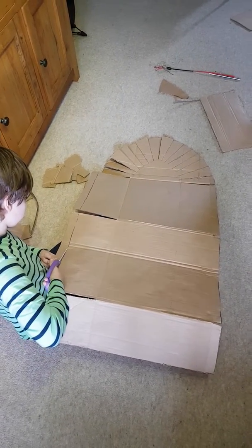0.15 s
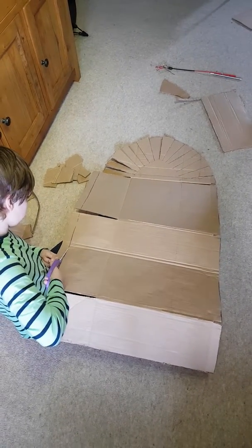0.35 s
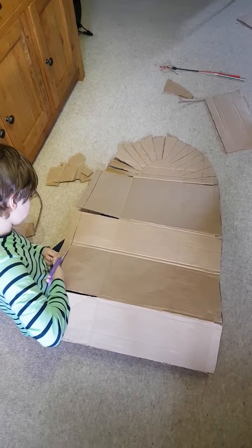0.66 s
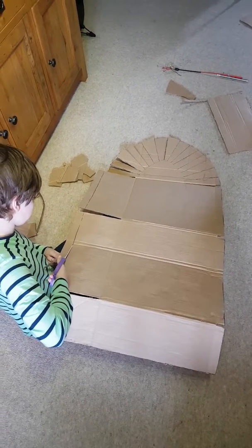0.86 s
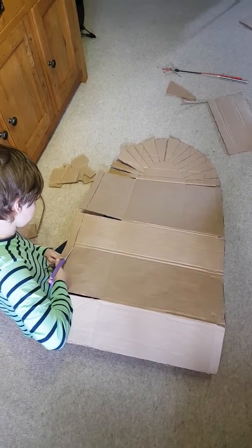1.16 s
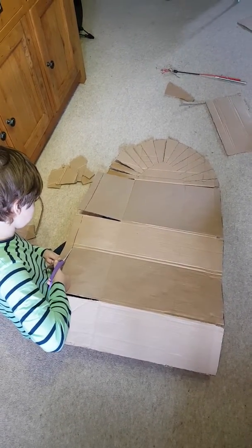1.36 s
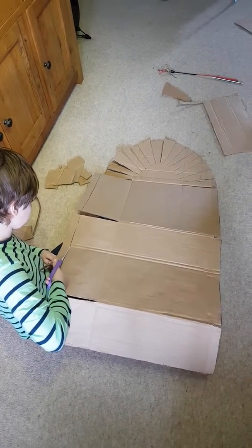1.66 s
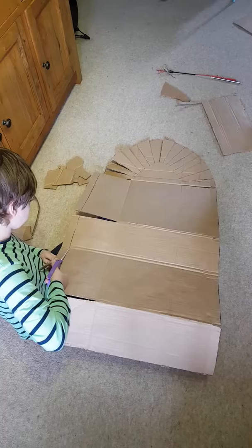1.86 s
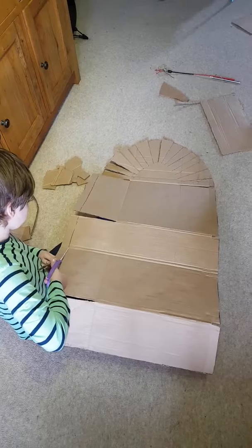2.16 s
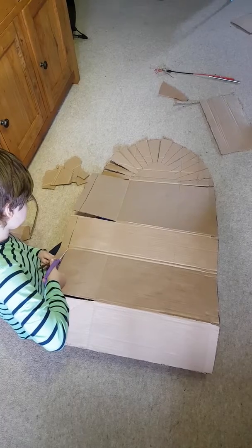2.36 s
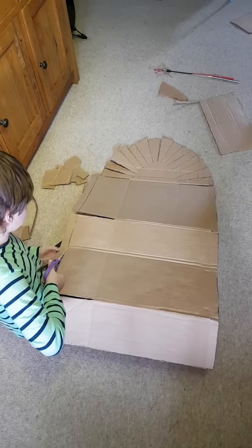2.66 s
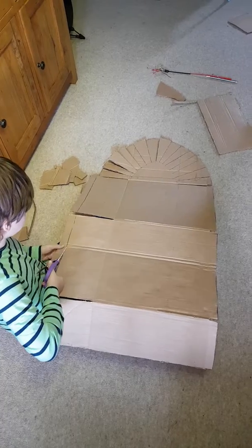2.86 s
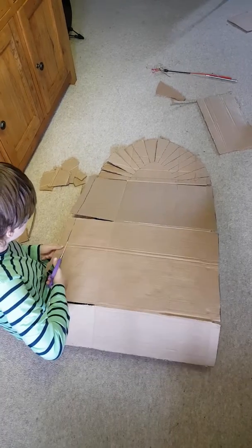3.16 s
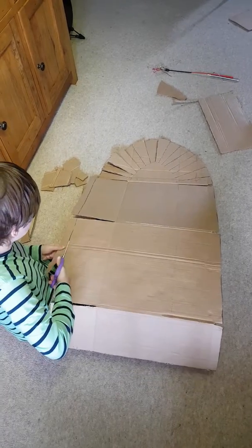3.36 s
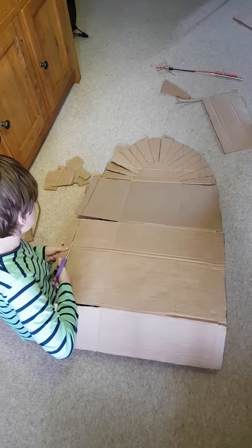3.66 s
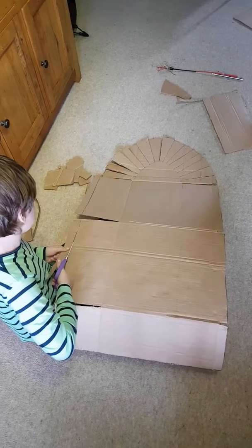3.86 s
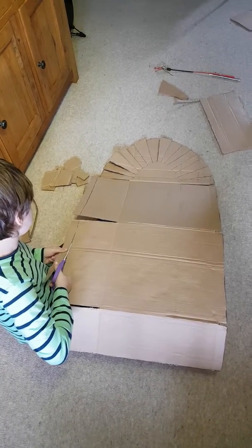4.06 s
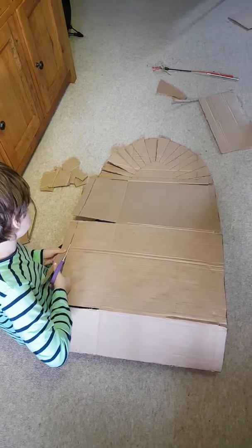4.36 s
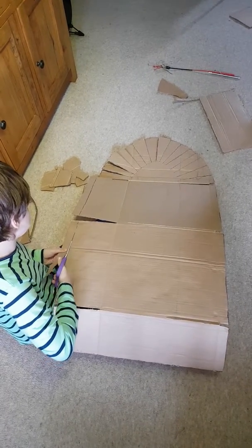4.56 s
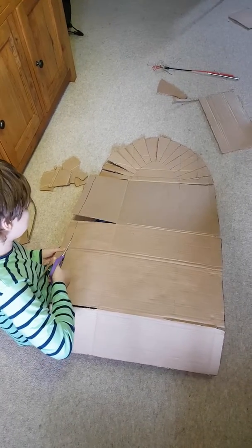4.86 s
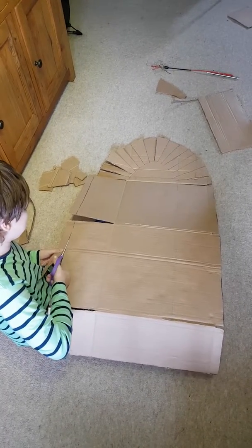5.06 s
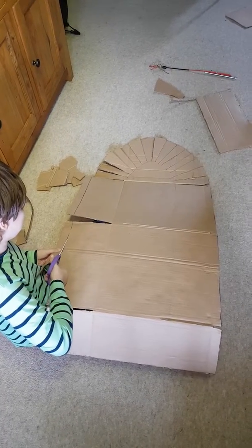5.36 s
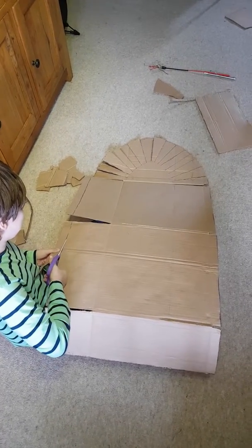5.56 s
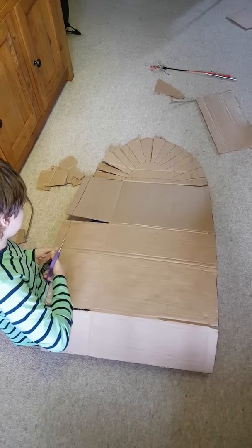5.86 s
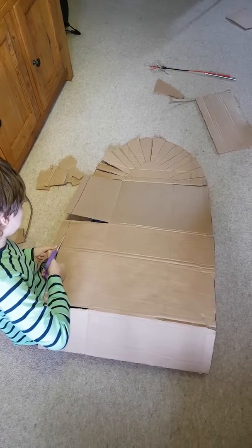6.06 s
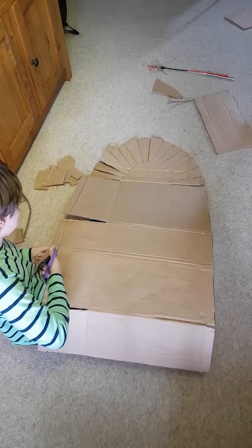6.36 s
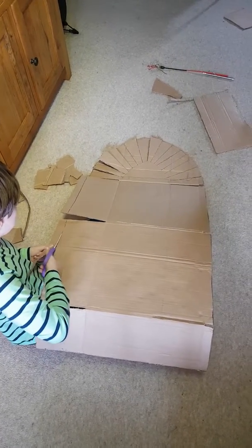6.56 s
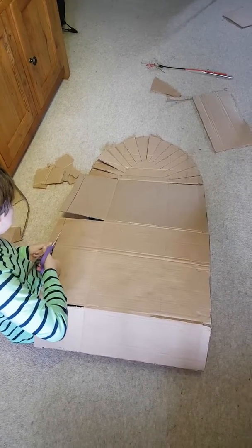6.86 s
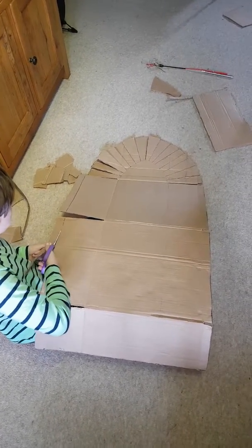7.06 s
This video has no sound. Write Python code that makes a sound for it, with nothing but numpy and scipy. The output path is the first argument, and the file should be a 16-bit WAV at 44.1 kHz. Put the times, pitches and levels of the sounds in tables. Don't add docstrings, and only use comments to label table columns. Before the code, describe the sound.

Close stereo sound of scissors working through thick cardboard in a small quiet room. Two light crunches open, then firmer snips with boxy thuds around one and two seconds, a tiny steel clink at three, a dense crackling run near four, a hard knock just before five, and more snips to the end. Dry rasping between bites, low steady hum and faint hiss beneath.

```python
import sys
import numpy as np
from scipy import signal
from scipy.fft import rfft, irfft, next_fast_len
from scipy.io import wavfile
from scipy.ndimage import uniform_filter1d, minimum_filter1d, map_coordinates

SR = 44100
rng = np.random.default_rng(int(sys.argv[2]) if len(sys.argv) > 2 else 0)


def unload_wav(signal):
    wavfile.write(
        sys.argv[1],
        SR,
        np.round(np.clip(np.atleast_2d(signal).T, -1, 1) * 32767).astype(np.int16),
    )


def boost(x):
    u = np.asarray(x, float) / 20
    return 10 ** u


N = 318402

# frequency in Hz, density in dB per Hz.
CRACK_COLOUR = [(880, -50), (1500, -6), (2100, -4.5), (3840, -5), (6000, -1.5), (8000, -6.5), (8740, -4),
                (10700, -9.5), (14200, -5), (16000, -27)]
# moment of most drag in s, swelling time in s,
# fading time in s, scrape level in dB, weight on the sheet in dB re the scrape.
BLADE_STROKES = [(0.19, 0.088, 0.069, -72, -13), (0.44, 0.26, 0.2, -64.5, -12),
                 (0.8, 0.088, 0.051, -62.5, 8.5), (1.014, 0.049, 0.092, -68.5, 8),
                 (1.48, 0.048, 0.072, -60, 4), (1.72, 0.24, .1, -71.5, 2.5),
                 (2.052, 0.15, 0.017, -72.5, 6.5), (2.65, 0.17, 0.1, -67.5, -3),
                 (3.05, 0.058, 0.14, -55.5, 0.5), (3.315, 0.16, 0.017, -68.5, 1.5),
                 (3.75, 0.22, 0.12, -70.5, -3), (3.89, .05, .06, -71, -2), (4.43, 0.035, 0.22, -64, 5.5),
                 (5.105, .12, 0.076, -60, 0.5), (5.33, 0.087, .1, -81, 13), (5.74, 0.2, 0.11, -67.5, 4.5),
                 (6.07, 0.14, 0.29, -74, 11.5), (6.35, 0.071, 0.14, -59.5, 1.5),
                 (6.64, 0.12, 0.12, -71.5, 11), (6.965, 0.061, 0.16, -62.5, 2), (7.22, 0.15, .1, -72.5, 8)]


def unit(x):
    return x / np.sqrt(np.mean(x ** 2) + 1e-20)


def along(points, hz):
    f, v = np.transpose(points)
    return np.interp(np.log(hz + 1), np.log(f + 1), v)


def curves(rows):
    s, *cols = np.transpose(rows)
    return [np.interp(np.arange(N) / SR, s, c) for c in cols]


def wobble(rate):
    coarse = np.arange(0, N + 32, 32)
    knots = rng.standard_normal(int(N * rate / SR) + 4)
    return np.interp(np.arange(N), coarse, map_coordinates(knots, [coarse * rate / SR]))


def filtered(x, response):
    m = next_fast_len(x.shape[-1] + SR // 2)
    spectrum = rfft(x, m) * response(np.fft.rfftfreq(m, 1 / SR))
    return irfft(spectrum, m)[..., :x.shape[-1]]


def causal(spectrum):
    ceps = irfft(np.log(boost(along(spectrum, np.fft.rfftfreq(1024, 1 / SR))) + 1e-6))
    ceps[1:512] *= 2
    ceps[513:] = 0
    pulse = irfft(np.exp(rfft(ceps)))
    return pulse / np.linalg.norm(pulse)


def paper(x, spectrum):
    return signal.oaconvolve(x, causal(spectrum)[None], axes=1)[:, :N]


def blend(pair, alike):
    def turn(hz):
        return np.arccos(np.clip(along(alike, hz), -1, 1)) / 2
    mid, side = filtered(pair, lambda hz: np.array([np.cos(turn(hz)), np.sin(turn(hz))]))
    return np.array([mid + side, mid - side])


def gritty(count, rows, spread_db):
    size = boost(spread_db * rng.exponential(size=(rows, count)))
    return unit(size * rng.standard_normal((rows, count)))


def sheet(force, group, spread_db, detune):
    # frequency in Hz, level in dB, t60 in s.
    modes = [
        [(146.6, -28, 0.09), (171, -5, 0.072), (229, -41, 0.062), (278.4, -9, 0.15), (298.7, -3.5, 0.12),
         (298.2, -3.5, 0.066), (335, -15, 0.13), (419, -14.5, 0.029)],
        [(441.6, -2.5, 0.048), (489, 2.5, 0.044), (543, -11.5, 0.1), (586.6, -3, 0.11), (640, -4, 0.049),
         (698, -23, 0.065), (734, -17.5, 0.16)],
        [(960, -14, 0.019), (950, 10, 0.013), (1023, 4, 0.019), (1105, 9, 0.023), (1312, -8, 0.018),
         (1377, 2.5, 0.0043), (1570, -62, 0.0088), (1910, -59, 0.016)],
    ]
    apart_hz = [1250, 694, 685]
    side_db = [-1.5, -6, -5]
    t = np.arange(SR // (8 + 3 * group)) / SR
    hz, db, t60 = np.transpose(modes[group])[:, :, None]
    strong, tune, shift = rng.standard_normal((3, *hz.shape))
    turn = 2 * np.pi * hz * (1 + detune * tune) * t
    decay = boost(db + spread_db * strong - 60 * t / t60)
    ring = []
    for side in (0.5, -0.5):
        phase = side * shift * hz / apart_hz[group]
        ring.append(boost(side * side_db[group]) * (decay * np.sin(turn + phase)).sum(0))
    ring = np.array(ring)
    ring = ring / np.linalg.norm(ring) * np.sqrt(2)
    return signal.oaconvolve(force[None], ring, axes=1)[:, :len(force)]


def background():
    # frequency in Hz, rms level in dB.
    mains = [(100, -56.5), (300, -73)]
    # time in s, level in dB.
    drone_course = [(0, -76), (2, -76), (3.2, -69), (4.3, -69), (4.6, -60.5), (6, -66), (7.22, -68)]
    # time in s, frequency in Hz.
    whine_drift = [(0, 14070), (1.1, 14070), (1.4, 14140), (2.4, 14130), (2.8, 14080), (3.6, 14110),
                   (4.3, 14150), (5.5, 14160), (7.22, 14150)]
    # frequency in Hz, density in dB per Hz.
    hiss_colour = [(12, -41), (20, -18), (48, -19), (75, -12.5), (125, -14.5), (200, -13.5), (300, -17),
                   (391, -20), (859, -27.5), (1200, -25.5), (1500, -32), (4000, -42), (9860, -46),
                   (13500, -39.5), (15700, -38.5), (16000, -75)]
    # frequency in Hz, left-right correlation.
    hiss_alike = [(60, 0.97), (130, 0.84), (290, 0.85), (640, 0.37), (1410, 0.14), (3100, -0.18),
                  (6820, 0.014), (15000, -0.3)]
    t = np.arange(N) / SR
    hum = 0
    for hz, db in mains:
        hum = hum + boost(db + 3.0 + 0.15 * wobble(1.8)) * np.sin(2 * np.pi * hz * t + 0.85)
    drone_hz = 67.5 + 2.94 * wobble(4.6)
    drone_level = boost(curves(drone_course)[0] + 1.6 * wobble(5))
    drone = drone_level * np.sin(2 * np.pi * np.cumsum(drone_hz) / SR)
    whine = []
    for port in "LR":
        whine_hz = curves(whine_drift)[0] + 22 * wobble(90)
        whine.append(boost(-81.5 + 2.5 * wobble(30)) * np.sin(2 * np.pi * np.cumsum(whine_hz) / SR))
    hiss = filtered(rng.standard_normal((2, N)), lambda hz: boost(along(hiss_colour, hz)))
    hiss = boost(-61) * unit(blend(hiss, hiss_alike))
    return hum * boost([[-1.7], [1.5]]) + drone + whine + hiss


def swells(level_db):
    depth_db, roundness = 17, 1.38
    total, t = np.zeros(N), np.arange(N) / SR
    for (s, rise, fall, *_), db in zip(BLADE_STROKES, level_db):
        near = slice(max(round((s - 0.4) * SR), 0), round((s + 0.6) * SR))
        late = t[near] - s
        away = np.where(late < 0, -late / max(rise, 0.01), late / max(fall, 0.01))
        total[near] += boost(2 * (db - depth_db * away ** roundness))
    return np.sqrt(total)


def rubbing():
    # time in s, level in dB.
    lean_course = [(0, -79.5), (0.3, -72), (0.6, -68), (0.92, -82.5), (1.3, -74), (1.6, -85), (1.92, -77),
                   (2.2, -83.5), (2.6, -77), (2.95, -70.5), (3.4, -81), (4.2, -76), (4.7, -76.5),
                   (4.96, -77), (5.5, -75), (5.9, -78.5), (6.5, -79), (7.22, -79)]
    # frequency in Hz, density in dB per Hz.
    scrape_colour = [(2650, -13.5), (4500, 1), (5080, 1), (7180, -4.5), (8880, -3.5), (14400, -9),
                     (16000, -14)]
    # frequency in Hz, density in dB per Hz.
    rustle_colour = [(700, -38), (1300, 0), (2000, 2.5), (3500, -2), (4600, -13.5), (7000, -27)]
    rustle_db, lean_scrape_db = -5.5, -10.5
    stir_db, lean_stir_db = (0.5, -4.5, -3.5), (-6, -4, -5.5)
    fidget_db = 1.5
    scrape_db, weight_db = np.transpose(BLADE_STROKES)[3:]
    scrape, weight = swells(scrape_db), swells(scrape_db + weight_db)
    lean = boost(curves(lean_course)[0])
    slips_db = 1.2 * wobble(40) + 1.5 * wobble(150)
    drag = gritty(count=N, rows=7, spread_db=0.5) * boost(slips_db)
    drum = 0
    for group in range(3):
        hand = boost(lean_stir_db[group] + fidget_db * wobble(7.4)) * lean
        force = np.hypot(boost(stir_db[group]) * weight, hand)
        drum = drum + sheet(force * drag[4 + group], group, spread_db=4.5, detune=0)
    scrape_force = np.hypot(boost(-3.5) * scrape, boost(lean_scrape_db) * lean)
    rustle_force = np.hypot(boost(rustle_db) * scrape, lean)
    steel = paper(scrape_force * drag[:2], scrape_colour)
    return steel + paper(rustle_force * drag[2:4], rustle_colour) + drum


def ticks():
    # start in s, peak level in dB, left minus right in dB.
    snaps = [(0.178, -43, -4), (0.186, -38.5, 0), (0.3197, -60, -3), (1.0146, -43, -6), (3.7542, -42, -4),
             (3.9677, -38.5, -3), (4.0786, -39, -8), (5.043, -48, -17), (5.2729, -44, -1),
             (5.3102, -42.5, 5), (5.335, -42, -5), (5.593, -56, -0.5), (6.351, -38.5, 1), (6.6453, -47, -6),
             (7.2074, -52, 3)]
    t, out = np.arange(SR // 100) / SR, np.zeros((2, N + SR))
    for s, db, pan_db in snaps:
        start = round(s * SR)
        side_db = np.array([[pan_db], [-pan_db]]) / 2
        envelope = boost(db - 6.5 + side_db - 60 * t / 0.006)
        out[:, start:start + len(t)] += envelope * rng.standard_normal((2, len(t)))
    return filtered(paper(out, CRACK_COLOUR), lambda hz: 1j * hz / (1j * hz + 3500))


def bites():
    # start in s, crack peak in dB, push on the whole sheet in dB re the
    # crack, push on the cut edge in dB re the crack, tear length in s.
    cut_flutes = [(0.198, -52.5, -4, -6.5, 0.083), (0.356, -38.5, -2, -2.5, 0.11),
                  (0.3766, -40, -11, -21, 0.061), (0.5581, -38.5, -6, -4, 0.056),
                  (1.1296, -51.5, 16.5, 4, 0.13), (1.1643, -33.5, 3.5, 0, 0.056), (1.734, -40, 13, 4, 0.09),
                  (1.7905, -35, 4.5, 7.5, .07), (2.4107, -32.5, 16, 9, 0.06), (3.0043, -49, -5, -0.5, .079),
                  (3.0148, -41, -14, -6, 0.096), (3.7822, -38.5, 9.5, 0, 0.081),
                  (3.8312, -40.5, 0.5, 0.5, 0.072), (3.9805, -35.5, 2.5, -2, 0.074),
                  (4.029, -43, 6.5, 1, 0.24), (4.1059, -37.5, 1, 0, 0.053), (4.7294, -38.5, 8.5, 0, 0.14),
                  (4.8729, -32, 0, -1, 0.018), (5.3504, -47, 2.5, -1.5, 0.12),
                  (5.3829, -43, 3.5, -0.5, 0.08), (5.9759, -49.5, -2, 0.5, .081),
                  (6.0111, -40.5, -1.5, 1.5, .099), (6.127, -38, -1, 2, 0.055), (6.667, -34, 3, -3, .067)]
    # start in s, crack peak in dB, then push on
    # the whole sheet, on the loose flap and on the cut edge, each in dB re the crack.
    crushed_flutes = [(0.5888, -58.5, 11.5, 7, -18), (0.6895, -63.5, 18.5, 11, 9),
                      (0.7892, -53.5, 5, -18, 7.5), (1.2132, -45, 10, 11, 0.5), (1.2446, -63, 21, 6, -6),
                      (1.829, -50, 8.5, 5, -3), (2.2958, -76.5, 15, 21, 4), (3.9885, -45, 10.5, -16, 5),
                      (4.0586, -59, -2, 17.5, -13), (4.1452, -52, -2, 12.5, -9), (5.3978, -42, 3.5, 3, -1),
                      (6.1601, -55, 11.5, 18.5, -1), (6.2674, -69.5, 15.5, 20.5, 10),
                      (6.7009, -47.5, 7.5, 10.5, 5.5), (6.72, -44.5, 5, 10.5, 1), (6.745, -63, -2, 24, -11)]
    damping_db_s = (-11, 31, 220)
    crush_s, flap_db = 0.069, -1.5
    blow_s, blow_db = 0.00232, 21.5
    group_gain_db = (4.5, 4.2, 3.5)
    t = np.arange(SR // 6) / SR
    blow = boost(blow_db) * np.sin(np.pi * np.minimum(t / blow_s, 1)) ** 2 / (blow_s * SR / 2)
    crack, drum = np.zeros((2, 2, N + SR))
    flutes = [(s, db, whole_db, edge_db + flap_db, edge_db, length)
              for s, db, whole_db, edge_db, length in cut_flutes]
    flutes += [(*row, crush_s) for row in crushed_flutes]
    for s, db, *drum_db, length in flutes:
        start, (lag, pan) = round(s * SR), rng.standard_normal(2)
        fibres = gritty(count=len(t), rows=6, spread_db=1.0)
        tear = boost(-30 * (t / max(length, 0.005)) ** 0.88)
        snap = fibres[0] * boost(-60 * t / 0.009) * (1 - np.exp(-t / 0.00013))
        snap = snap / np.abs(snap).max()
        for port, side in enumerate((1, -1)):
            burst = snap + boost(-15.5) * tear * fibres[1 + port]
            arrival = start + max(round(14 * lag * side), 0)
            crack[port, arrival:arrival + len(t)] += boost(db + 4.0 + (0.2 * pan + 0.5) * side) * burst
        push = (boost(-60 * t / 0.022) + boost(-24) * tear) * (1 - np.exp(-t / 0.0032))
        for group in range(3):
            force = push * boost(-damping_db_s[group] * t) * fibres[3 + group]
            if group == 0:
                force = force + blow
            ringing = sheet(force, group, spread_db=6.0, detune=0.015)
            level = boost(db + drum_db[group] + group_gain_db[group])
            drum[:, start:start + len(t)] += level * ringing / np.abs(ringing).max()
    return paper(crack[:, :N], CRACK_COLOUR) + drum[:, :N]


def cutting():
    return filtered(bites() + rubbing() + ticks(), lambda hz: (1j * hz / (1j * hz + 135)) ** 3)


def room(x):
    # frequency in Hz, t60 in s.
    room_t60 = [(150, 0.28), (1000, 0.21), (4000, 0.31), (12000, 0.21)]
    # frequency in Hz, left-right correlation.
    room_alike = [(100, 0.85), (300, 0.96), (700, 0.22), (1500, 0.012), (8000, 0.026)]
    out, step, delay = np.zeros((2, N + SR)), SR // 3, 130
    for start in range(0, N, step):
        hz, t, z = signal.stft(rng.standard_normal((2, SR // 4)), SR, nperseg=256)
        decay = boost(-60 * t / along(room_t60, hz)[:, None])
        tail = signal.istft(z * decay, SR, nperseg=256)[1]
        tail = tail / np.linalg.norm(tail[0])
        answer = signal.fftconvolve(x[1:, start:start + step], tail, axes=1)
        out[:, start + delay:start + delay + answer.shape[1]] += answer
    return blend(out[:, :N], room_alike)


def clinks():
    # start in s, peak level in dB, frequency in Hz, t60 in s.
    touches = [(3.012, -43, 4930, 0.03), (3.016, -36.5, 4970, 0.023), (3.016, -51, 8800, .025),
               (3.017, -48, 5900, .025), (3.031, -44, 4920, 0.027), (3.177, -50, 4970, 0.0073),
               (6.012, -51, 4300, .025), (1.22, -37, 484, 0.21), (2.296, -39.5, 900, 0.014),
               (2.46, -39.5, 624, 0.16), (4.085, -42, 639, 0.13), (4.135, -45, 627, 0.2),
               (6.127, -30.5, 1037, 0.049), (6.151, -37, 529, 0.13), (6.735, -41, 521, 0.29),
               (0.575, -51, 612, 0.21), (0.79, -40, 303, .15), (1.167, -30, 289.5, 0.15),
               (1.17, -32.5, 498, 0.17), (4.729, -29, 292, 0.2), (4.875, -32, 294, 0.15),
               (1.217, -37, 299, .2), (1.217, -40, 1040, .04), (4.755, -39, 1010, 0.059)]
    t, out = np.arange(SR // 4) / SR, np.zeros(N + SR)
    for s, db, hz, t60 in touches:
        start = round(s * SR)
        build_up = 1 - np.exp(-t * hz / 3.3)
        out[start:start + len(t)] += boost(db - 60 * t / t60) * np.sin(2 * np.pi * hz * t) * build_up
    return out[:N] * boost([[-1.2], [1.2]])


def scene():
    cut = cutting()
    return boost(0.5) * cut + boost(-2.0) * room(cut) + clinks() + background()


def roll_off(x):
    return signal.sosfilt(signal.butter(12, 16490, fs=SR, output="sos"), x)


def record(dry):
    limited = filtered(dry, lambda hz: hz < 16450)
    needed = np.minimum(1, 0.15 / (np.abs(limited).max(0) + 1e-9))
    held = minimum_filter1d(needed, size=3000, origin=1300)
    gain = uniform_filter1d(held, size=300)
    return roll_off(gain * limited - 0.0005)


dry = scene()
out = record(dry)
unload_wav(out)
```